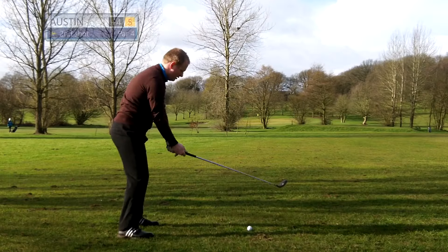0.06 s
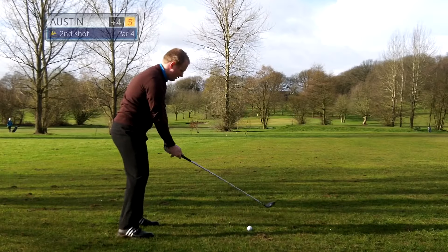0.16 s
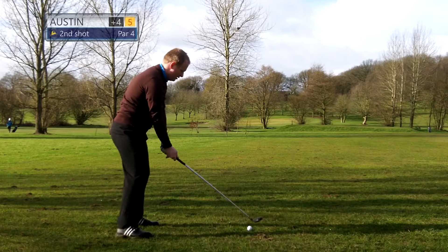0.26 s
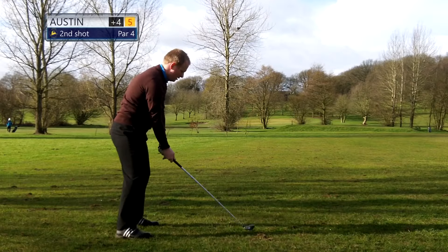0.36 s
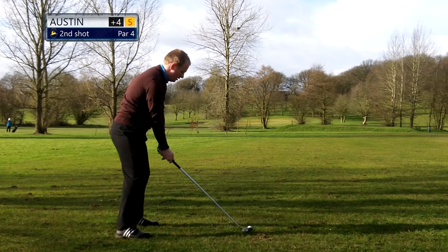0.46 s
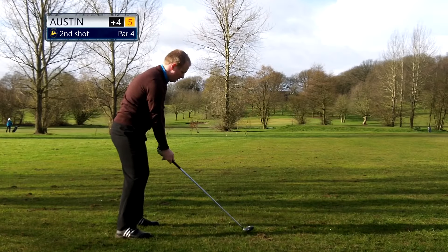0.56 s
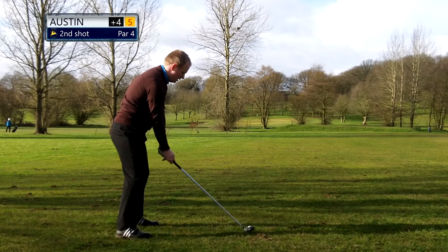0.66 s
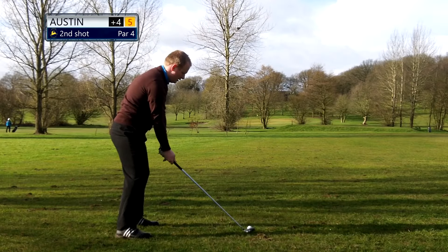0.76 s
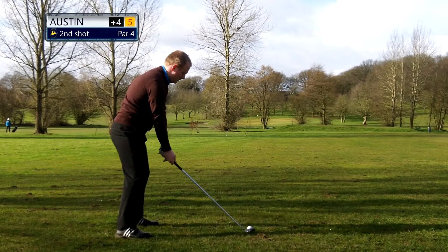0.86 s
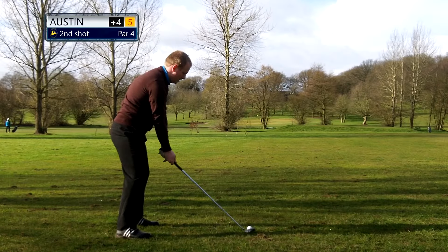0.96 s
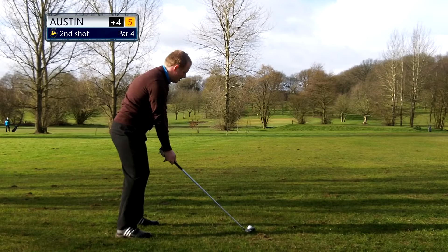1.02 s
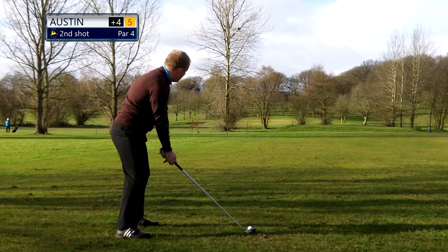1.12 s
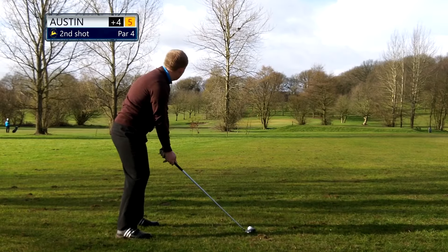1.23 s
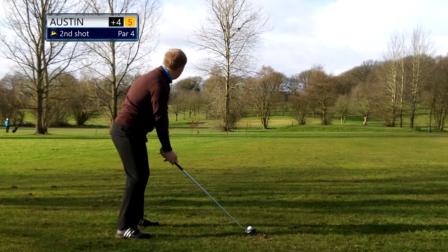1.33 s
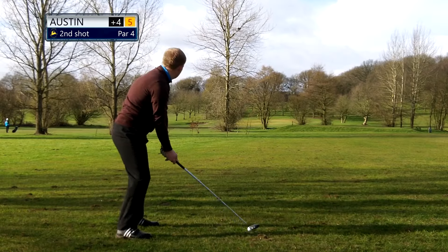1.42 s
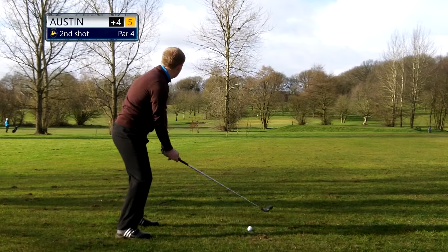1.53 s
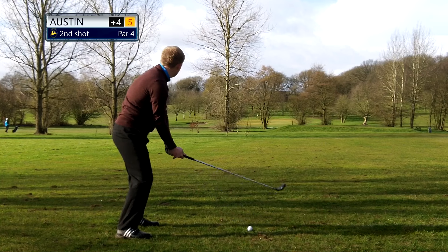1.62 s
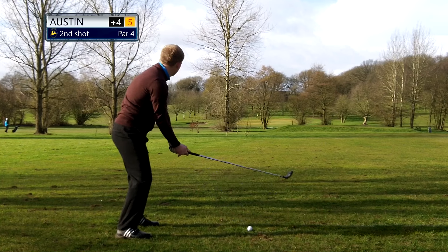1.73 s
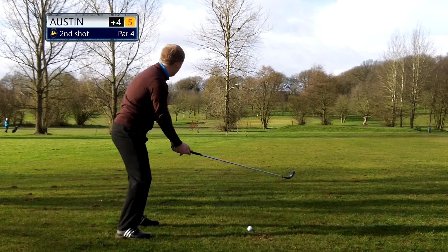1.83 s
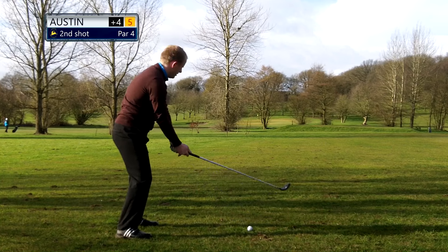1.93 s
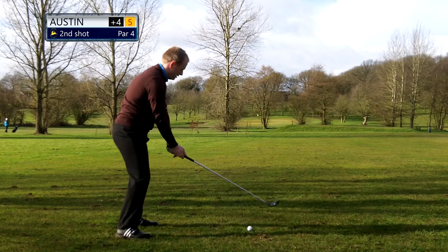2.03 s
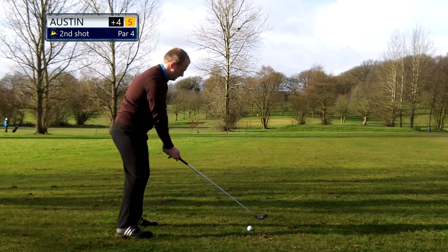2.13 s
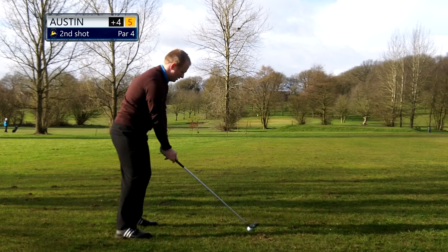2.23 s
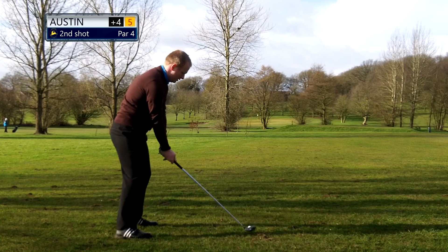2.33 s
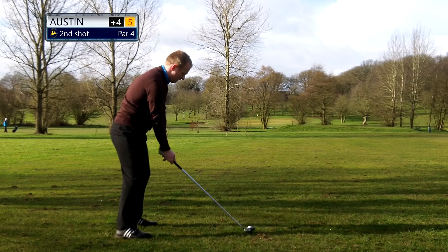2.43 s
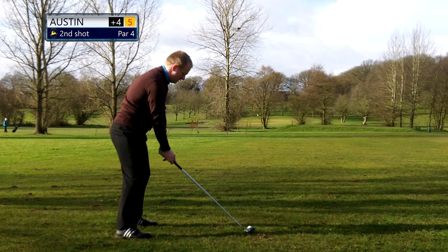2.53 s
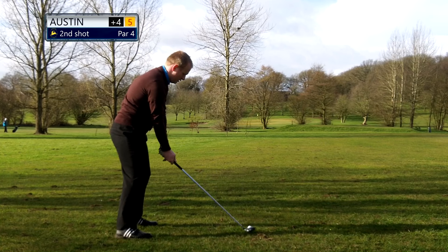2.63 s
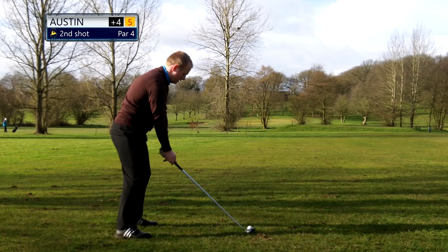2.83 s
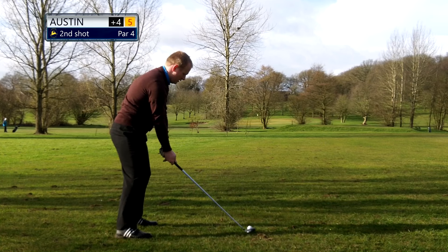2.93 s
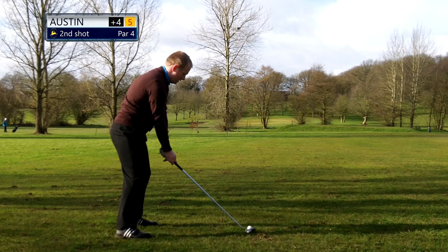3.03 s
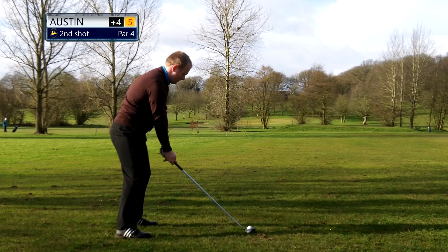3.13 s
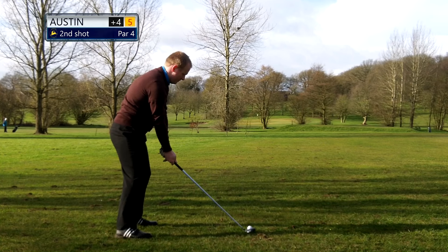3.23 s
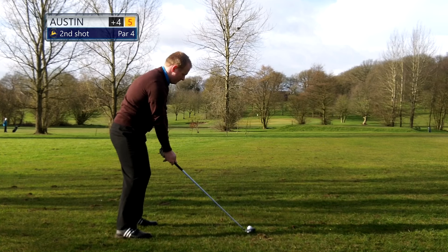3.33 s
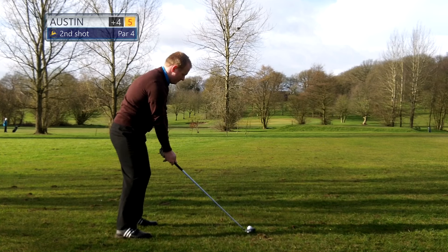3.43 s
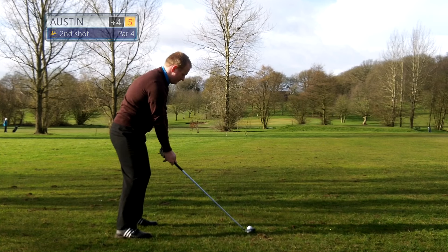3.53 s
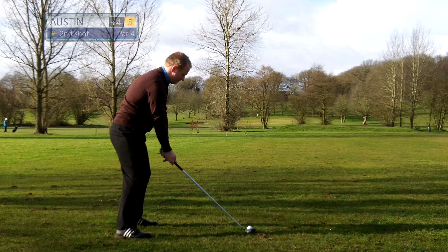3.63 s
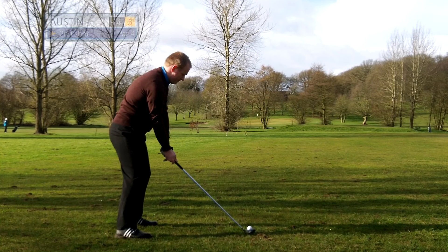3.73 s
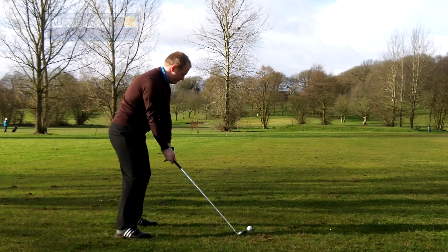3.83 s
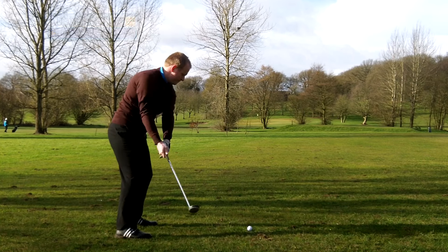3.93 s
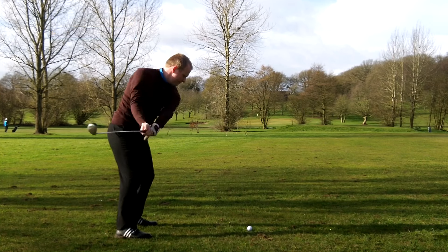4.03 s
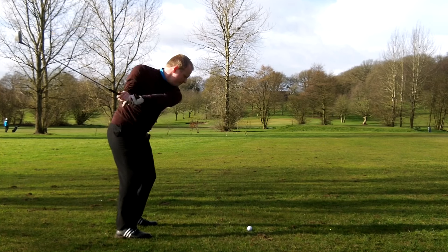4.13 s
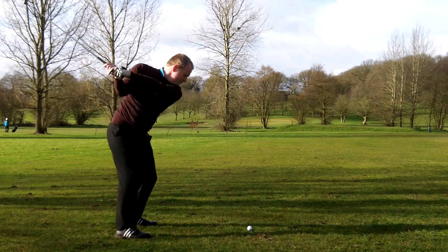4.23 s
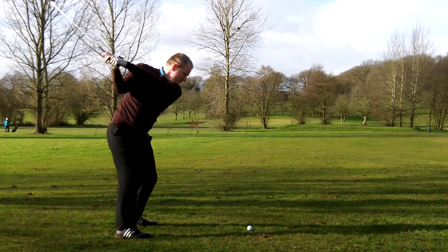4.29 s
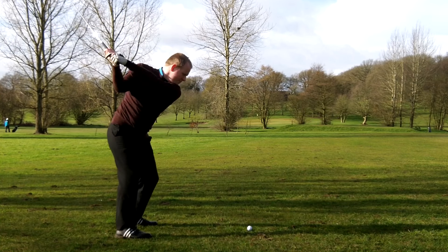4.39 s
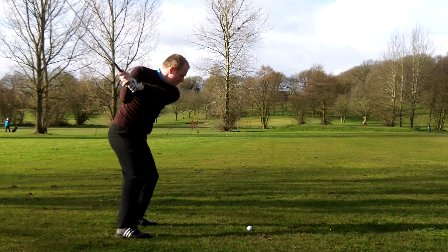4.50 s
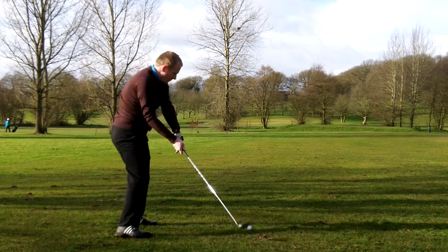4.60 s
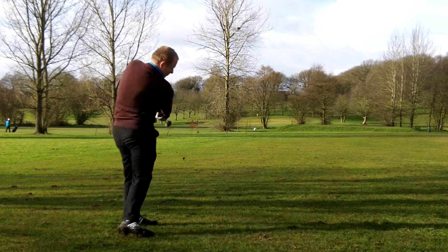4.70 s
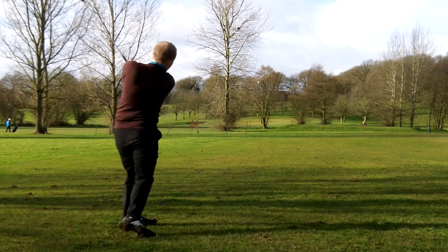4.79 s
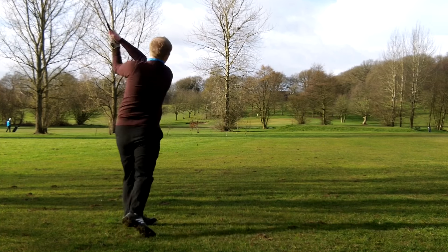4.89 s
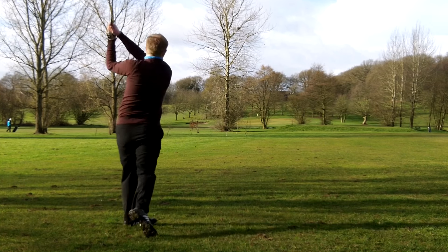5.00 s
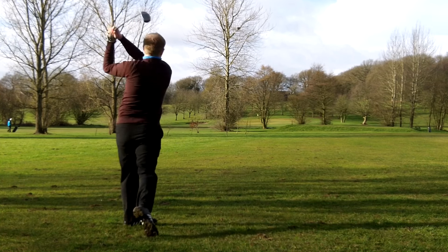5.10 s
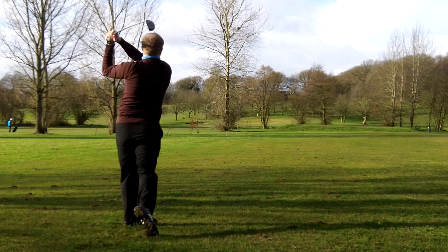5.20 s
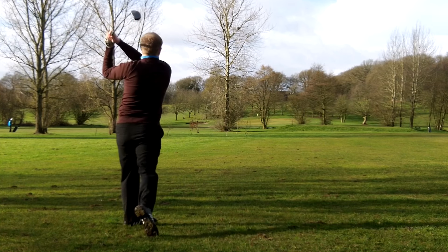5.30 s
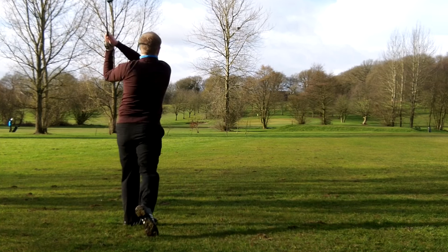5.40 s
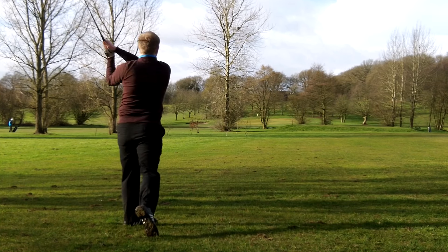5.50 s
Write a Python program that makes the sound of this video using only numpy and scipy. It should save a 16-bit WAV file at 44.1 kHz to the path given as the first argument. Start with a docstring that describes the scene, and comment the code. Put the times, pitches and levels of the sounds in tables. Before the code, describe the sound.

Outdoors on an open golf course, low wind rumbles on the microphone and small birds chirp faintly. A club softly knocks the grass around one second. After a long quiet wait, a brief swish leads into one very loud, dry click of iron on ball, with torn turf. The background dips, then swells back with a faint echo from trees, light crumbs of soil and rustling clothes.

```python
"""A golf iron strikes a ball on an open course: one hard click, made of decaying tones set off by a brief force.
Before it the club touches the grass and swishes through the air, all shaped noise. After it the blade cuts
turf, the tree line answers with a scattered echo and crumbs of soil land. Birds call as gliding tones, over
noise for breeze, trees and hiss. The click overloads the camera, whose limiter ducks everything and lets it
swell back."""
import sys
import numpy as np
from scipy import signal
from scipy.fft import rfft, irfft, next_fast_len
from scipy.io import wavfile
from scipy.ndimage import minimum_filter1d, map_coordinates

SR = 44100
rng = np.random.default_rng(int(sys.argv[2]) if len(sys.argv) > 2 else 0)


def digitize_waveform(pressure):
    """Quantize a signal to 16-bit integers and store it at the path in sys.argv[1].

    Rows of a 2-D input are taken as channels; values are limited to [-1, 1].
    """
    field = np.atleast_2d(pressure).T
    bounded = np.clip(field, -1, 1)
    quanta = np.round(bounded * 32767).astype(np.int16)
    wavfile.write(sys.argv[1], SR, quanta)


N = 244755
T = np.arange(N) / SR  # time of each sample (s)
STRIKE_S = 4.7388  # the moment club meets ball

# phrases of twitter deep in the wood: start_s, length_s, centre_hz, level_db of one note
TWITTER_PHRASES = [(1.62, .4, 3380, -64.5), (2.439, .41, 3980, -61.5), (4.88, .22, 4120, -61.5)]


def amp(db):
    """Turn decibels into a gain."""
    return 10 ** (np.asarray(db) / 20)


def unit(x):
    """Scale a sound to an average (rms) level of 1."""
    return x / np.sqrt(np.mean(x ** 2) + 1e-20)


def wobble(rate, count=N):
    """A smooth random curve through `rate` random points a second."""
    points = rng.standard_normal(int(count * rate / SR) + 4)
    return map_coordinates(points, [np.arange(count) * rate / SR])


def filtered(x, response):
    """Make each frequency of x louder or softer by response(hz)."""
    m = next_fast_len(N + 8192)
    gain = response(np.fft.rfftfreq(m, 1 / SR))
    return irfft(rfft(x, m) * gain, m)[:N]


def noise(spectrum):
    """Random noise of rms 1, shaped by a list of (pitch_hz, relative level_db)."""
    f, db = np.transpose(spectrum)

    def response(hz):
        return amp(np.interp(np.log(hz + 1), np.log(f), db))

    return unit(filtered(rng.standard_normal(N), response))


def burst(start, attack, t60):
    """An envelope that rises quickly and dies away, by 60 dB in t60 seconds."""
    age = np.maximum(T - start, 0)
    return (1 - np.exp(-age / attack)) * np.exp(-np.log(1000) * age / t60)


def swell(peak_s, rise_s, fall_s):
    """An envelope that grows to 1 at its peak and falls away, both exponentially."""
    return np.exp(-np.maximum((peak_s - T) / rise_s, (T - peak_s) / fall_s))


def tree_line(x, t60, build):
    """Trunks and branches scatter a thin, slowly building echo."""
    tail = (rng.standard_normal(N) * burst(0, build, t60))[:2 * SR]
    return signal.fftconvolve(x, tail / np.linalg.norm(tail))[:N]


def microphone_hiss(level_db):
    """The microphone adds a steady, treble-heavy hiss."""
    # colour of the hiss: pitch_hz, relative level_db
    hiss_colour = [(1000, -5.5), (6500, -3.5), (7300, -5.5), (7900, -22.5), (8400, -4), (9000, 1),
                   (12000, 1.5), (14500, 3), (15200, 0), (15600, -40)]
    return amp(level_db) * noise(hiss_colour)


def landscape(roar_db, drone_db, growth_db_per_s, nearest_s, trees_db):
    """A steady low roar and a far drone that slowly grows, under the even rush of bare trees."""
    # colours of roar, trees and drone: pitch_hz, relative level_db
    roar_colour = [(40, -1), (80, 2), (120, 1), (190, .5), (270, -.5), (350, -9), (600, -17), (2000, -62)]
    tree_colour = [(100, -12.5), (350, -2), (550, -1.5), (900, 2), (1400, -3.5), (2200, -7.5),
                   (3500, -12.5), (5000, -17), (6800, -20.5), (7800, -37), (16000, -64)]
    drone_colour = [(130, -21), (200, -1), (275, 0), (340, -11), (520, -27), (1000, -60)]
    roar = amp(roar_db + 0.6 * wobble(5.97)) * noise(roar_colour)
    approach_db = -growth_db_per_s * np.abs(T - nearest_s)  # loudest at nearest_s
    drone = amp(drone_db + approach_db + 0.6 * wobble(3.96)) * noise(drone_colour)
    trees = amp(trees_db + 0.28 * wobble(2.96)) * noise(tree_colour)
    return roar + drone + trees


def buffet(breeze_db, gust_rise_s, gust_fall_s):
    """Eddies rumble on the microphone; gusts ride on the steady breeze."""
    # gusts: peak_s, level_db relative to the steady breeze
    gust_list = [(.25, 8), (1.14, 7), (1.29, 1), (1.6, -1), (1.74, 1), (2.11, -1), (2.78, -1), (3.48, -1)]
    # colour of the rumble: pitch_hz, relative level_db
    rumble_colour = [(8, -4.5), (25, 2), (60, -5.5), (110, -11), (200, -29), (500, -78)]
    strength = 1 + sum(amp(db) * swell(s, gust_rise_s, gust_fall_s) for s, db in gust_list)
    return amp(breeze_db) * strength * unit(noise(rumble_colour) * amp(2.2 * wobble(14)))


def chorus(steady_db, haze_db, spread):
    """The farthest birds merge into a faint band of sound, and each phrase leaves a haze in it."""
    haze = 0
    for s, length, hz, db in TWITTER_PHRASES:
        middle = s + length / 2
        haze = haze + amp(db + haze_db) * np.exp(-((T - middle) / (spread * length)) ** 2)
    band = noise([(2600, -15), (3350, 2.5), (3900, -1.0), (4400, -4), (5000, -33)])
    return (amp(steady_db) + haze) * amp(1.5 * wobble(15)) * band


def note(start, length, start_hz, end_hz, db, flutter):
    """One bird note: a gliding whistle that swells and fades, hoarse when its pitch flutters."""
    u = np.linspace(0, 1, int(length * SR))  # 0 to 1 along the note
    glide = start_hz + (end_hz - start_hz) * u
    pitch = glide * (1 + flutter * wobble(500, count=8192)[:len(u)])
    loudness = amp(db) * 2 * np.sqrt(u * (1 - u))
    tone = loudness * np.sin(2 * np.pi * np.cumsum(pitch) / SR)
    return np.pad(tone, (round(start * SR), N))[:N]


def twitter(notes_per_s, note_s, spread, glide, flutter):
    """Each phrase is a run of short notes that glide between random pitches around its centre."""
    song = np.zeros(N)
    for s, length, hz, db in TWITTER_PHRASES:
        starts = np.arange(s, s + length, 1 / notes_per_s)
        for start, (late, height, slope) in zip(starts, rng.standard_normal((64, 3))):
            pitch = hz * (1 + spread * height)
            end_pitch = pitch * (1 + glide * slope)
            song += note(start + .008 * late, note_s, pitch, end_pitch, db, flutter)
    return song


def peeps(length_s, start_hz, hz_per_s, flutter):
    """One bird repeats the same thin peep, whose pitch sags."""
    # peeps: start_s, level_db
    peep_list = [(1.04, -60.5), (1.325, -52.5), (1.852, -54), (3.357, -54.5), (3.86, -57), (4.415, -54),
                 (5.209, -60)]
    end_hz = start_hz + hz_per_s * length_s
    return sum(note(s, length_s, start_hz, end_hz, db, flutter) for s, db in peep_list)


def whistles(flutter):
    """Other birds hold nearly level whistles."""
    # whistles: start_s, length_s, start_hz, rise_hz_per_s, level_db
    whistle_list = [(.807, .055, 2307, -300, -49.5), (1.105, 0.09, 3410, 1100, -53.5),
                    (1.238, .04, 2290, -400, -56.5), (1.535, 0.065, 2420, -900, -54),
                    (1.891, .065, 1700, 2000, -56), (1.905, 0.063, 2370, -1100, -50),
                    (2.377, 0.096, 2320, 200, -56.5), (2.789, .045, 3720, 1700, -52),
                    (3.08, .085, 1684, 800, -56.5), (3.207, .04, 3450, -1000, -58.5),
                    (4.618, .075, 3830, 2000, -53), (4.756, .064, 3710, -300, -45),
                    (4.824, .17, 3700, 100, -61), (4.89, .06, 4230, -700, -61),
                    (5.47, .063, 4110, 1201, -59)]
    return sum(note(s, length, hz, hz + rise * length, db, flutter)
               for s, length, hz, rise, db in whistle_list)


def rasps(length_s, hz_per_s, flutter):
    """Falling chirps sound hoarse because their pitch flutters more."""
    # rasps: start_s, start_hz, level_db
    rasp_list = [(2.133, 3470, -52.5), (2.66, 3850, -52), (3.495, 3440, -49), (3.664, 3470, -59),
                 (4.19, 3440, -56)]
    return sum(note(s, length_s, hz, hz + hz_per_s * length_s, db, flutter) for s, hz, db in rasp_list)


def slurs(shortest_s, s_per_octave, flutter):
    """A songbird slides quickly from one pitch to another; a wider slur takes longer."""
    # slurs: start_s, start_hz, end_hz, level_db
    slur_list = [(.170, 4300, 3300, -52), (.193, 3750, 2700, -51), (.245, 3250, 3050, -52),
                 (.254, 3100, 3680, -54), (.404, 4400, 3550, -52.5), (.473, 3010, 3350, -48),
                 (.582, 4150, 5650, -53.5), (.648, 4000, 2690, -54), (.908, 4100, 4400, -56),
                 (1.355, 4850, 5150, -59), (2.572, 3950, 3600, -50.5), (2.745, 4450, 4300, -56)]
    song = np.zeros(N)
    for s, hz, end_hz, db in slur_list:
        length = shortest_s + s_per_octave * abs(np.log2(end_hz / hz))
        song += note(s, length, hz, end_hz, db, flutter)
    return song


def birds(echo_db, pure_flutter, slur_flutter):
    """Peeps, whistles, rasps, slurs and twitter, blurred by the trees."""
    # flutter, spread and glide are fractions of the pitch
    song = peeps(length_s=0.059, start_hz=4530, hz_per_s=-1400, flutter=pure_flutter)
    song += whistles(pure_flutter)
    song += rasps(length_s=0.074, hz_per_s=-2500, flutter=0.024)
    song += slurs(shortest_s=.018, s_per_octave=.028, flutter=slur_flutter)
    song += twitter(notes_per_s=46, note_s=.028, spread=0.0583, glide=0.0695, flutter=.01)
    return song + amp(echo_db) * tree_line(song, t60=0.76, build=0.013)


def turn(level_db, peak_s, rise_s, fall_s, grain_db):
    """Cloth and grass rub in many tiny slips while the body unwinds."""
    rub = noise([(300, -2), (900, 1), (2300, 1.0), (3800, -6.5), (5500, -16), (8000, -37)])
    slips = unit(rub * amp(grain_db * wobble(350)))
    return amp(level_db + 1.7 * wobble(40)) * swell(peak_s, rise_s, fall_s) * slips


def touches(knock_db, soil_db, rustle_t60):
    """Each touch of club or shoe crushes grass; a heavy one also knocks on the turf and thuds in the soil."""
    # touches: start_s, level_db of the rustle, thud_db relative to the rustle
    touch_list = [(1.035, -41.5, -22), (1.082, -30.5, -2.5), (1.099, -44, -1), (1.187, -48.5, 2.5),
                  (5.012, -44, -8)]
    # colour of the rustling blades: pitch_hz, relative level_db
    grass_colour = [(150, -20), (500, 0.5), (900, 4), (1600, 1), (2600, 0.5), (3600, -12), (6000, -33),
                    (10000, -49)]
    rustle = sum(amp(db) * burst(s, 0.00077, rustle_t60) for s, db, thud_db in touch_list)
    knock = sum(amp(db + thud_db + knock_db) * burst(s, 0.00076, 0.085) for s, db, thud_db in touch_list)
    thud = sum(amp(db + thud_db + soil_db) * burst(s, 0.0048, 0.31) for s, db, thud_db in touch_list)
    grass = unit(noise(grass_colour) * amp(2.4 * wobble(900)))
    turf = noise([(200, -29), (550, 7), (1000, 1), (1600, -11), (3500, -37)])
    soil = noise([(20, -6), (62, 3), (130, -6.0), (300, -16.5), (700, -38), (2000, -61)])
    return rustle * grass + knock * turf + thud * soil


def crumbs(attack_s, t60, grain_db):
    """Each clod lands in the grass with a short, crackly patter."""
    # crumbs landing: start_s, level_db
    crumb_list = [(5.046, -44), (5.064, -42), (5.086, -49), (5.119, -48), (5.150, -44.5)]
    # colour of the patter: pitch_hz, relative level_db
    crumb_colour = [(200, -16), (600, -3), (1500, 0), (2500, 4), (3200, -5), (4200, -14), (8000, -35)]
    patter = sum(amp(db) * burst(s, attack_s, t60) for s, db in crumb_list)
    return patter * unit(noise(crumb_colour) * amp(grain_db * wobble(900)))


def divot(cut_db, spray_db, crack_db):
    """The grooves scrape the ball; then the blade tears through turf and throws up a spray of grass."""
    # colour of the torn turf: pitch_hz, relative level_db
    divot_colour = [(200, 7), (900, -16), (1600, -3), (2500, 8.5), (3500, -8), (6000, -12), (7500, -42),
                    (14000, -43)]
    grooves = noise([(2000, -14), (5000, 2), (9000, -7), (15500, 0)])
    scrape = amp(crack_db) * burst(STRIKE_S, .0003, 0.0095) * grooves
    cut = amp(cut_db) * burst(4.744, .0005, 0.045)
    spray = amp(spray_db) * burst(4.75, 0.0042, 0.27)
    return scrape + (cut + spray) * unit(noise(divot_colour) * amp(2.3 * wobble(597)))


def swing(swish_db, whistle_db, whistle_hz, glide, downswing_s, follow_s):
    """Air noise grows with the cube of speed; vortices off the shaft whistle higher as it speeds up."""
    # colour of the swish: pitch_hz, relative level_db
    swish_colour = [(150, -13), (400, 4), (700, -6), (1500, -1), (2500, -3), (3300, -8), (6000, -24),
                    (9000, -46)]
    # the club head gathers speed up to the ball and loses it in the follow-through
    speed = swell(STRIKE_S, downswing_s, follow_s)
    pitch = whistle_hz * speed ** glide * (1 + 0.035 * wobble(200))
    whistle = np.sin(2 * np.pi * np.cumsum(pitch) / SR)
    return speed ** 3 * (amp(swish_db) * noise(swish_colour) + amp(whistle_db) * whistle)


def strike(peak_db, contact_ms):
    """The ball squashes on the face for half a millisecond; the change of force rings ball and head."""
    # ringing tones of ball and club head: pitch_hz, relative level_db, t60_s
    ring_tones = [(1790, -6, 0.0031), (2420, 0.5, 0.003), (2490, -29, 0.024), (3380, -10.5, 0.01),
                  (5070, -9, .008), (6310, -11.5, 0.0071), (9050, -2, .004), (13800, -4, 0.0047)]
    t = T[:SR // 10]
    force = np.abs(np.sin(np.pi * np.minimum(t * 1000 / contact_ms, 1))) ** 1.5
    ring = sum(amp(db) * np.exp(-np.log(1000) * t / t60) * np.cos(2 * np.pi * hz * t)
               for hz, db, t60 in ring_tones)
    force_change = np.gradient(np.pad(force, (1, 0)))
    click = -signal.fftconvolve(force_change, ring)
    start = round(STRIKE_S * SR)
    return amp(peak_db) * np.pad(click / np.abs(click).max(), (start, N))[:N]


def scene():
    """The shot and its echo among birds, breeze and microphone hiss."""
    click = strike(peak_db=24, contact_ms=0.492)
    echo = amp(-53) * tree_line(click, t60=2.7, build=0.031)
    club = swing(swish_db=-38.0, whistle_db=-39, whistle_hz=748, glide=.28, downswing_s=.11, follow_s=.1)
    turf = divot(cut_db=-16, spray_db=-44, crack_db=-12)
    turf += touches(knock_db=-6.0, soil_db=2, rustle_t60=0.052)
    turf += crumbs(attack_s=.0015, t60=0.072, grain_db=3.5)
    clothes = turn(level_db=-51.5, peak_s=4.87, rise_s=.13, fall_s=0.48, grain_db=3.0)
    song = birds(echo_db=-7.5, pure_flutter=0.0033, slur_flutter=0.015)
    song += chorus(steady_db=-71.0, haze_db=-5, spread=.6)
    wind = buffet(breeze_db=-49.5, gust_rise_s=0.065, gust_fall_s=0.1)
    wind += landscape(roar_db=-50.5, drone_db=-49.0, growth_db_per_s=4.5, nearest_s=5.14, trees_db=-51.5)
    hiss = microphone_hiss(level_db=-62.5)
    return (click + echo + turf + club + clothes + wind + hiss + song)[None]


def limiter(x, threshold_db, release_db_per_s):
    """The gain drops at once around a peak and climbs back at a steady rate in decibels."""
    over = np.maximum(20 * np.log10(np.abs(x) + 1e-9) - threshold_db, 0)
    over = -minimum_filter1d(-over, size=48)  # widen each peak to about a millisecond
    recovery = release_db_per_s * T
    cut = np.maximum.accumulate(over + recovery) - recovery
    return x * amp(-cut)


def record(dry):
    """The camera limits, flattens what still overshoots and keeps nothing above its band limit."""
    top_hz = 16500
    x = limiter(dry[0], threshold_db=5, release_db_per_s=125)
    x = x / (1 + x ** 8) ** (1 / 8)  # bends smoothly toward full level 1
    return filtered(x, lambda hz: hz < top_hz)[None]


dry = scene()
out = record(dry)
digitize_waveform(out)
```